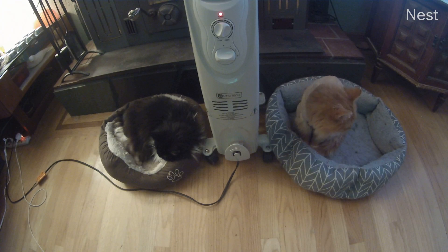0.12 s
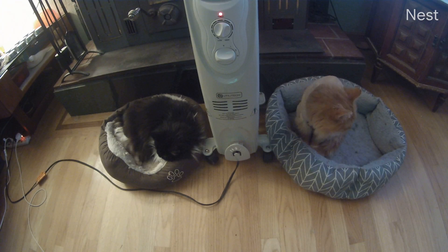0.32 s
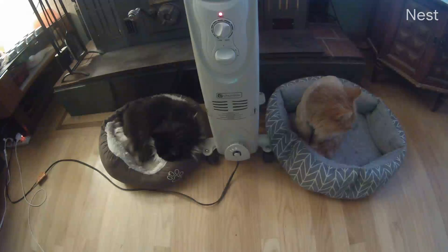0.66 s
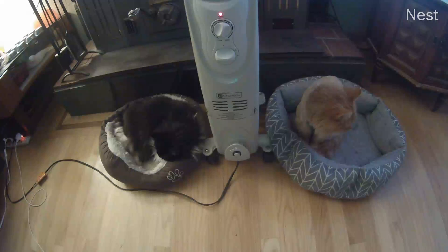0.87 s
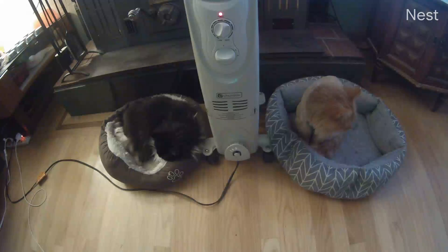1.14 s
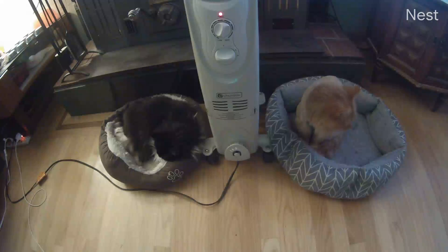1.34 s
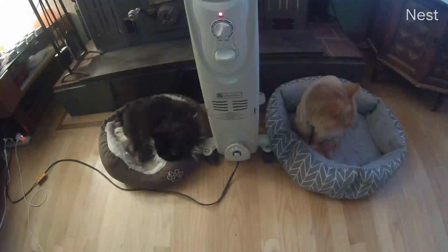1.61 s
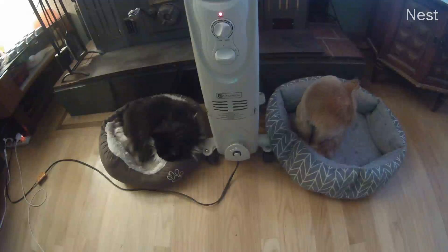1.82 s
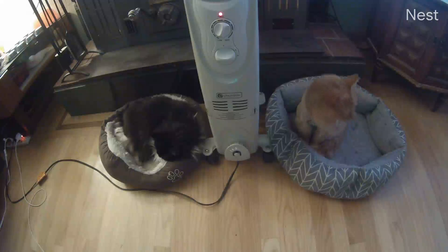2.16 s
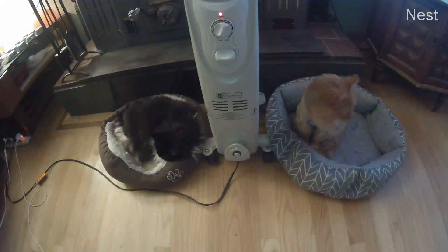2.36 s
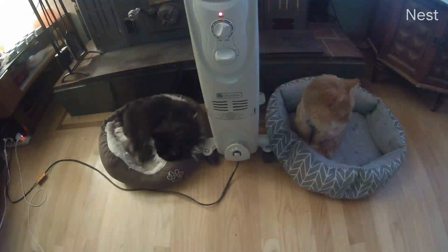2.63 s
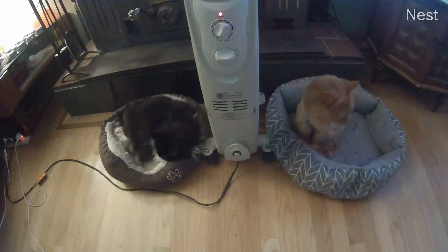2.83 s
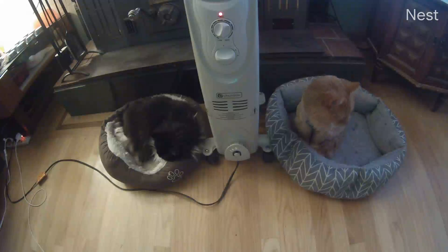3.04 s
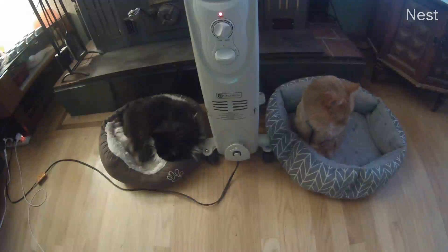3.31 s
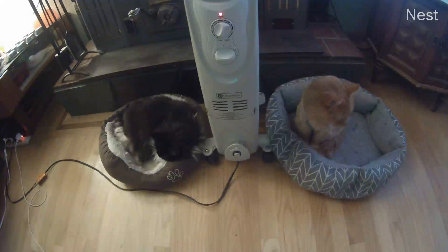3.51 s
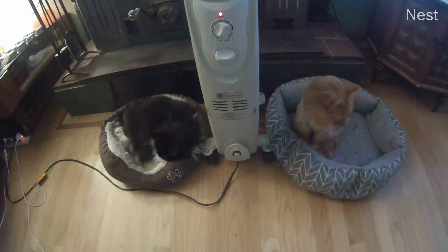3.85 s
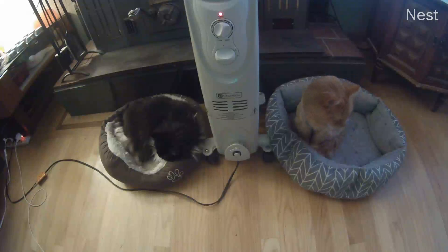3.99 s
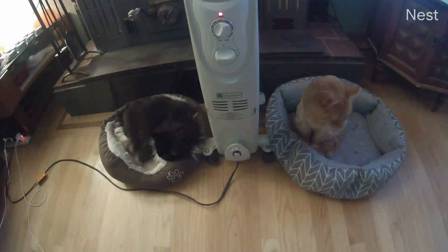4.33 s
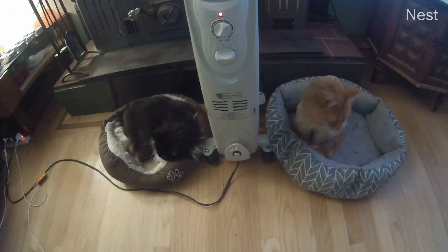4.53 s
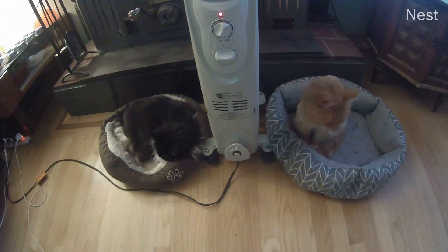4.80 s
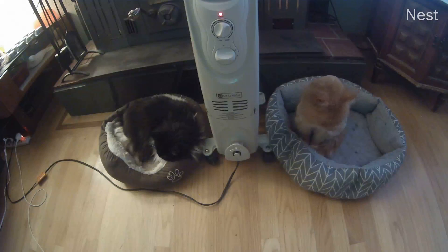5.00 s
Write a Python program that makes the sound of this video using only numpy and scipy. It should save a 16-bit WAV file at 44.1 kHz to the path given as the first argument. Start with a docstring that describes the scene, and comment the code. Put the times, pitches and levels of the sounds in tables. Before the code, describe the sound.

Six slow footsteps in loose slippers scuff and clap on a creaking wooden floor, over a faint steady hiss.

```python
"""Footsteps, probably in loose slippers: six slow steps on a wooden floor, some way from a small microphone.
Each sole touches down and slides, making friction noise; about a quarter second later the slipper strikes
the heel, one foot much harder than the other. The boards creak under the weight, and claps and creaks
excite the floor's modes. The room adds one strong reflection and a short reverberant tail.
A few faint, brief bursts of bright noise and a steady hiss lie underneath."""
import sys
import numpy as np
from scipy import signal
from scipy.fft import rfft, irfft, next_fast_len
from scipy.io import wavfile
from scipy.ndimage import uniform_filter1d

SR = 44100
rng = np.random.default_rng(int(sys.argv[2]) if len(sys.argv) > 2 else 0)


def bounce(signal):
    """Save signal as a 16-bit WAV file at the path given by the first command-line argument."""
    frames = np.transpose(np.atleast_2d(signal))
    limited = np.clip(frames, -1, 1)
    pcm = np.round(limited * 32767).astype(np.int16)
    wavfile.write(sys.argv[1], SR, pcm)


N = 227538
TIME = np.arange(N) / SR

# broad spectral envelope of the scuffs and of the bright bursts: frequency_hz, level_db
BROAD_SPECTRUM = [(100, -22), (250, -13.5), (480, -3), (1000, -2), (2000, -3.5), (3000, -1), (3800, -2),
                  (5000, 0), (6600, -2.5), (7500, -9), (8100, -23)]


def undb(db):
    """Amplitude ratio of a level in decibels."""
    return 10 ** (np.asarray(db) / 20)


def unit(x):
    """Normalisation to unit energy."""
    return x / np.sqrt(np.sum(x ** 2) + 1e-18)


def grains(count, spread_db):
    """Granular noise: a dense train of impulses of random, unequal strength, with unit rms."""
    size_db = spread_db * np.clip(rng.standard_normal(count), -2, 2)
    return unit(rng.standard_normal(count) * undb(size_db)) * np.sqrt(count)


def add(out, start_s, sound):
    """Superposition: a sound joins the mix at start_s."""
    start = int(round(start_s * SR))
    sound = sound[max(-start, 0):N - start]
    out[max(start, 0):max(start, 0) + len(sound)] += sound


def whiten(x, bins=241):
    """Spectral whitening: a burst's broad spectrum is levelled and its fine structure kept."""
    count = next_fast_len(len(x) + 2048, True)
    spectrum = rfft(x, count)
    power = np.abs(spectrum) ** 2
    return irfft(spectrum * np.sqrt(power.mean() / uniform_filter1d(power, bins)), count)[:len(x)]


def response(spectrum, corner_hz=SR, ring_hz=SR, ring_db=0, thud_db=0, ring_width=0.18):
    """Minimum-phase filter: a spectral envelope with a treble cut, a bass lift and one resonance."""
    size, thud_hz = 2048, 1320
    hz = np.maximum(np.fft.rfftfreq(size, 1 / SR), 1)
    points_hz, points_db = np.transpose(spectrum)
    envelope_db = np.interp(np.log(hz), np.log(points_hz), points_db)
    resonance_db = ring_db / (1 + (np.log(hz / ring_hz) / ring_width) ** 2)
    bass_db = thud_db / (1 + (hz / thud_hz) ** 6)
    gain = undb(envelope_db + resonance_db + bass_db) / np.sqrt(1 + (hz / corner_hz) ** 4)
    cepstrum = irfft(np.log(gain))
    cepstrum[1:size // 2] *= 2  # folding the cepstrum makes the response causal
    cepstrum[size // 2 + 1:] = 0
    return unit(irfft(np.exp(rfft(cepstrum))))


def room(lag_s, early_db, tail_db, echo_db=-1, early_s=0.021, build_s=0.0056):
    """Room impulse response: direct sound, one strong reflection, furniture scatter, a diffuse tail."""
    # reverberation time by band: frequency_hz, t60_s
    reverberation = [(300, 0.38), (1000, 0.41), (2800, 0.47), (6500, 0.32)]
    centres, t60s = np.transpose(reverberation)
    t = TIME[:SR // 2]
    hz = np.maximum(np.fft.rfftfreq(len(t), 1 / SR), 1)
    noise, tail = rfft(rng.standard_normal(len(t))), 0
    for share, t60 in zip(np.eye(len(centres)), t60s):
        band = irfft(noise * np.interp(np.log(hz), np.log(centres), share), len(t))
        tail = tail + band * np.exp(-np.log(1000) * t / t60)
    build = 1 - np.exp(-t / build_s)
    scatter = grains(len(t), spread_db=11) * np.exp(-t / early_s) * build
    path = undb(tail_db) * unit(tail * build) + undb(early_db) * unit(scatter)
    path[0] += 1
    path[int(lag_s * SR)] += undb(echo_db)
    return path


def noise_swells(swells, spectrum, spread_db, jitter_db, jitter_s=0.003, fall_power=1, ring_width=0.18):
    """Amplitude modulation: granular noise swells, jumps unevenly in level and dies away in the room."""
    out = np.zeros(N)
    t = TIME[:SR // 2] - 1 / 8  # time from the peak of the swell
    jitter_index = ((t - t[0]) / jitter_s).astype(int)
    for peak_s, rise_s, fall_s, level_db, corner_hz, ring_hz, ring_db in swells:
        envelope = np.exp(-np.where(t < 0, (t / rise_s) ** 2, np.abs(t / fall_s) ** fall_power))
        jitter = undb(jitter_db * rng.standard_normal(len(t))[jitter_index])
        path = unit(room(lag_s=0.0061, early_db=-0.5, tail_db=0.5))
        excitation = envelope * jitter * grains(len(t), spread_db)
        burst = whiten(signal.fftconvolve(excitation, path), bins=401)
        body = response(spectrum, corner_hz, ring_hz, ring_db, ring_width=ring_width)
        add(out, peak_s + t[0], undb(level_db) * signal.fftconvolve(burst, body))
    return out


def hiss(level_db=-57.5, drift_db_per_s=-0.3368, low_hz=185, whine_hz=4980, waver_db=0.8):
    """Filtered noise: a steady broadband hiss with a faint whine and a slight flutter."""
    # spectral envelope of the hiss: frequency_hz, level_db
    hiss_spectrum = [(90, -46.5), (160, -11), (250, -4), (500, 0.5), (1000, 2.5), (1600, 1.5), (2400, 3.5),
                     (3100, 0.5), (4200, -3), (5000, 0), (5450, -19), (6100, -6), (7300, -15),
                     (8000, -46.5)]
    colour = response(hiss_spectrum, ring_hz=whine_hz, ring_db=6, ring_width=0.0032)
    noise = signal.fftconvolve(rng.standard_normal(N + len(colour) - 1), colour, "valid")
    noise = signal.sosfilt(signal.butter(8, low_hz, "high", fs=SR, output="sos"), noise)
    knots_s, centres_hz = np.arange(0, TIME[-1] + 0.1, 0.1), np.geomspace(250, 7000, 9)
    count = next_fast_len(N, True)
    spectrum, hz = rfft(noise, count), np.fft.rfftfreq(count, 1 / SR)
    out = np.zeros(N)
    for share in np.eye(len(centres_hz)):
        band = irfft(spectrum * np.interp(hz, centres_hz, share), count)[:N]
        waver = np.interp(TIME, knots_s, rng.standard_normal(len(knots_s)))
        out += band * undb(waver_db * waver)
    return out * undb(level_db + drift_db_per_s * TIME)


def bright_bursts(corner_hz=9000, bright_hz=5800, bright_db=7):
    """Noise transients: a few faint, brief bursts of bright noise."""
    # faint bursts: peak_s, rise_s, fall_s, level_db
    bursts = [(.22, 0.022, 0.036, -63), (1.892, 0.039, 0.024, -68.5), (3.919, .008, 0.009, -62.5)]
    swells = [(*burst, corner_hz, bright_hz, bright_db) for burst in bursts]
    return noise_swells(swells, BROAD_SPECTRUM, spread_db=8.5, jitter_db=-3)


def floorboards(rise_share=0.52, reach_hz=1400):
    """Stick-slip friction: shifting weight rubs the boards and sets the floor ringing."""
    # knocks and creaks: peak_s, length_s, level_db, ring_hz, ring_db
    creaks = [(0.237, 0.073, -63.5, 290, 25), (0.905, 0.099, -59, 2780, 12), (0.996, 0.028, -51, 3160, 15),
              (1.169, 0.037, -54, 1460, 3), (2.517, 0.026, -37.5, 995, 8), (2.551, 0.04, -40.5, 530, 9.5),
              (2.567, 0.014, -36.5, 1310, 16.5), (2.611, 0.029, -43, 504, 12.5),
              (2.774, 0.062, -48, 764, 9.5), (4.127, 0.038, -44.5, 2070, 5), (5.127, 0.15, -59.5, 3070, 15)]
    # spectral envelope of the boards: frequency_hz, level_db
    board_spectrum = [(100, -29.5), (350, -9), (520, -3.5), (750, 3), (1000, 0), (1500, 3), (2600, -1.5),
                      (5000, -15.5), (7000, -35.5)]
    swells = []
    for peak_s, length_s, level_db, ring_hz, ring_db in creaks:
        rise_s, fall_s = rise_share * length_s, (1 - rise_share) * length_s
        swells.append((peak_s, rise_s, fall_s, level_db, ring_hz + reach_hz, ring_hz, ring_db))
    rubbing = noise_swells(swells, board_spectrum, spread_db=11, jitter_db=-0.5, ring_width=0.22)
    return floor_resonance(rubbing, ring_db=1.5)


def floor_resonance(contact, ring_db):
    """Modal response: a contact sound is joined by the damped sinusoids it excites in the floor."""
    # modes of the wooden floor: pitch_hz, level_db, t60_s
    floor_modes = [(524, -3, .12), (630, -9, .2), (958, -3, .08), (1208, -1, .2), (1846, 1.5, .28),
                   (2005, -5, .14), (2198, 0, .12), (2440, -3, .14), (2640, 2, .1), (2964, 1.5, .16),
                   (3414, 1, .11), (3950, -2, .06), (4288, 0, .12), (5075, 0, .14)]
    t, ring = TIME[:SR // 2], 0
    for pitch_hz, level_db, t60_s in floor_modes:
        decay = np.exp(-np.log(1000) * t / t60_s)
        ring = ring + undb(level_db) * 2 * np.cos(2 * np.pi * pitch_hz * t) * decay / decay.sum()
    return contact + undb(ring_db) * signal.fftconvolve(contact, ring)[:N]


def soles():
    """Sliding friction: each sole lands with a short, dull brush, then slides brightly and brakes."""
    # soles meeting the boards: touch_s, touch_db, slide_lag_s, slide_db, stop_s, ring_hz
    scuffs = [(.555, -63, .07, -52.5, 0.066, 2100), (1.360, -49, .022, -55.5, 0.079, 414),
              (2.235, -49.5, 0.034, -52.5, 0.046, 620), (3.062, -48.5, 0.058, -53.5, 0.058, 600),
              (3.768, -55.5, .035, -58, 0.12, 2020), (3.862, -47, .043, -48.5, 0.047, 1870),
              (4.688, -51.5, 0.026, -56, 0.074, 430)]
    rise_s, fall_s, touch_corner_hz, touch_ring_db = 0.013, 0.015, 3020, 6.5
    slide_corner_hz, slide_ring_db = 8350, 7
    touches, slides = [], []
    for touch_s, touch_db, lag_s, slide_db, stop_s, ring_hz in scuffs:
        touches.append((touch_s, rise_s, fall_s, touch_db, touch_corner_hz, ring_hz, touch_ring_db))
        slides.append((touch_s + lag_s, lag_s, stop_s, slide_db, slide_corner_hz, ring_hz, slide_ring_db))
    return (noise_swells(touches, BROAD_SPECTRUM, spread_db=8.5, jitter_db=2)
            + noise_swells(slides, BROAD_SPECTRUM, spread_db=11, jitter_db=1.5, fall_power=1.07))


def clap_force(roll_s, roll_db, growth_s=0.023, settle_s=0.004, settle_db=-3.5):
    """Impact force: a growing crackle as the contact rolls shut, one impulse, then a short settling."""
    t = TIME[:int(roll_s * SR)]
    roll = unit(grains(len(t), spread_db=2.5) * np.exp(t / growth_s))
    t = TIME[:SR // 50]
    settle = unit(grains(len(t), spread_db=4) * np.exp(-t / settle_s))
    return np.concatenate([undb(roll_db) * roll, [1], undb(settle_db) * settle])


def slipper_claps(rebound_roll_s=0.003):
    """Impact and rebound: the slipper hits the heel and bounces once; the floor thuds and rings."""
    # claps, hard and soft foot in turn, and a few light first contacts of the sole:
    # impact_s, level_db, roll_s, roll_db, rebound_lag_s, rebound_db,
    # ring_hz, ring_db, ring_width_ratio, echo_lag_s, thud_db, corner_hz
    impacts = [(.7450, -40.5, .003, 7, 0.0072, -1, 2800, 1, 0.2, 0.0052, 0.5, 7500),
               (0.7604, -24, .0045, 2, 0.01, -2, 1810, 6, 0.035, 0.0044, 2, 9500),
               (1.6245, -33.5, .025, 0, .009, -2.5, 2060, 5.5, 0.29, 0.0069, 4.5, 5860),
               (2.239, -40, .008, -4, 0.013, -3, 643, -5, 0.13, 0.0085, -3, 3000),
               (2.4914, -18.5, .0095, -1.5, .017, -16, 940, 4, .08, .0055, -1.5, 11100),
               (3.056, -42, .003, 2.5, 0.015, -14, 600, -2, 0.25, 0.0043, 18, 2200),
               (3.3003, -28, .017, -4, .0178, -4.5, 699, 11.5, 0.057, 0.0063, 5, 8160),
               (3.8555, -37, .0019, -0.5, .026, 1.5, 1710, 11, .15, .0027, 1, 2700),
               (4.0900, -20, .0081, -1.5, 0.041, -15, 1850, 6.5, 0.094, 0.0065, 1.5, 11900),
               (4.6815, -43.5, .002, -11, .008, -15, 450, 3, .18, 0.0071, 5, 1800),
               (4.938, -35, .008, -3.5, 0.01, -6, 1790, 5, 0.16, 0.0061, 7, 2420)]
    # spectral envelope of a clap: frequency_hz, level_db
    clap_spectrum = [(100, -24), (250, -12.5), (360, -1.5), (470, 2.5), (900, 3), (1300, 0.5), (2000, 6.5),
                     (3000, 8), (4200, 5), (5200, -0.5), (5600, -8), (6700, -7), (7500, -62.5)]
    out = np.zeros(N)
    for (impact_s, level_db, roll_s, roll_db, rebound_lag_s, rebound_db,
         ring_hz, ring_db, ring_width, echo_lag_s, thud_db, corner_hz) in impacts:
        body = response(clap_spectrum, corner_hz, ring_hz, ring_db, thud_db, ring_width)
        strike = (impact_s, level_db, roll_s)
        rebound = (impact_s + rebound_lag_s, level_db + rebound_db, rebound_roll_s)
        for hit_s, hit_db, lead_s in (strike, rebound):
            path = room(echo_lag_s, early_db=-2.5, tail_db=-0.06)
            burst = whiten(signal.fftconvolve(clap_force(lead_s, roll_db), path))
            start_s = hit_s - int(lead_s * SR) / SR
            add(out, start_s, undb(hit_db) * signal.fftconvolve(burst, body))
    return floor_resonance(out, ring_db=-5.5)


def scene():
    """Superposition of the sources in one channel; each table's levels are relative to its layer's gain."""
    steps = undb(10) * slipper_claps() + undb(5) * soles() + undb(1) * floorboards()
    return (steps + bright_bursts() + hiss())[None]


def record(dry, low_hz=230, top_hz=8500):
    """Band limiting: the small microphone loses the bass and the high treble."""
    thin = signal.sosfilt(signal.butter(1, low_hz, "high", fs=SR, output="sos"), dry)
    return signal.sosfilt(signal.ellip(8, 0.2, 70, top_hz, fs=SR, output="sos"), thin)


dry = scene()
out = record(dry)
bounce(out)
```